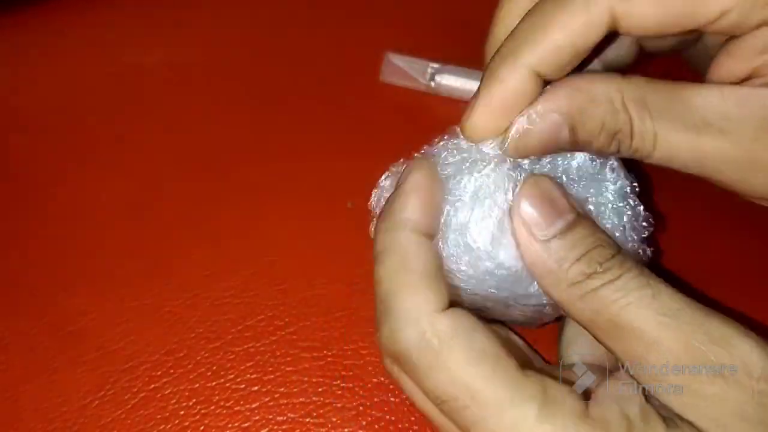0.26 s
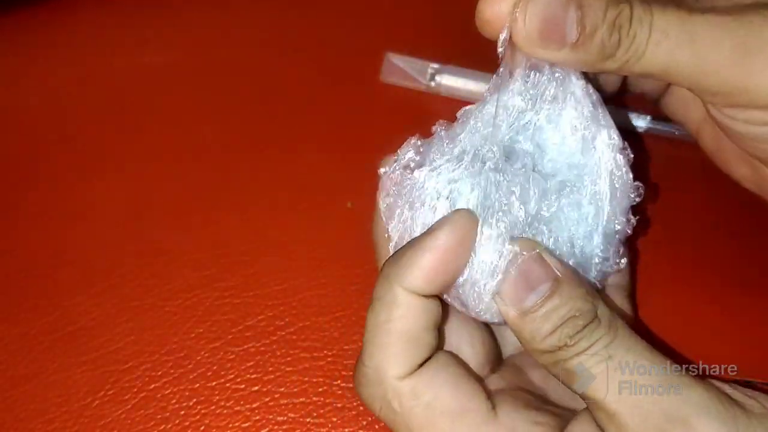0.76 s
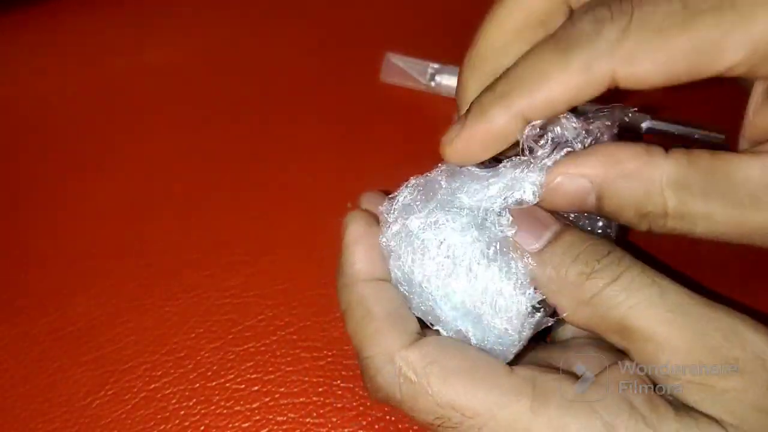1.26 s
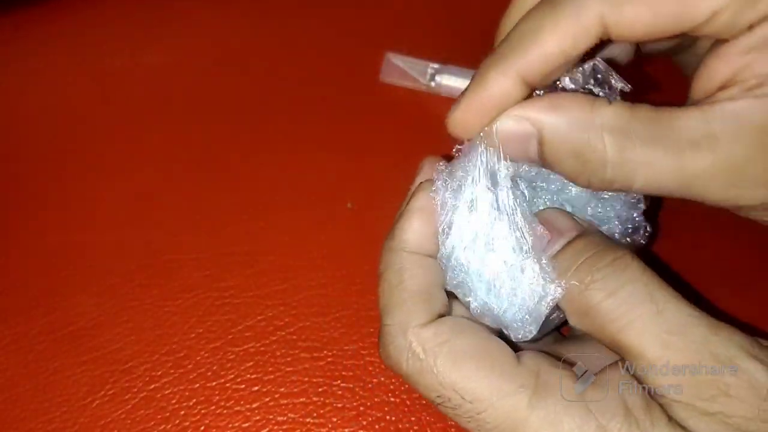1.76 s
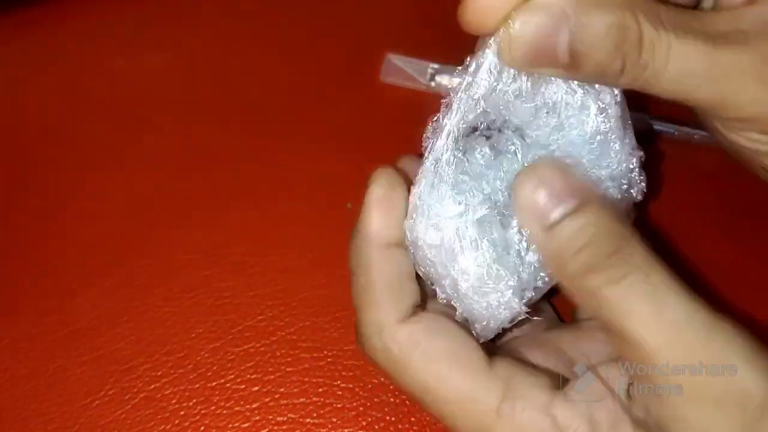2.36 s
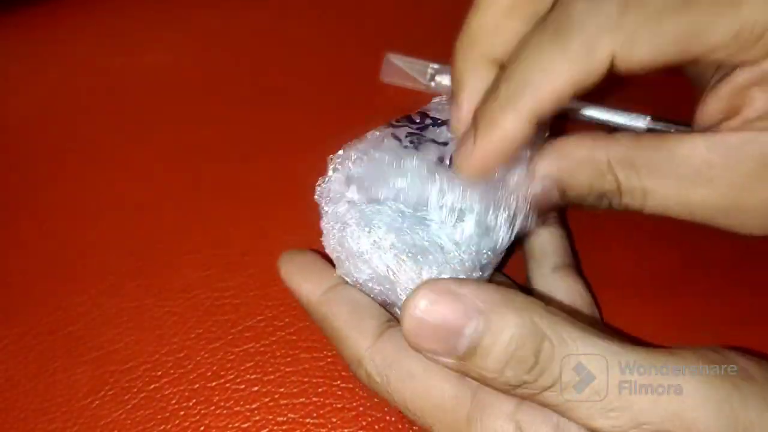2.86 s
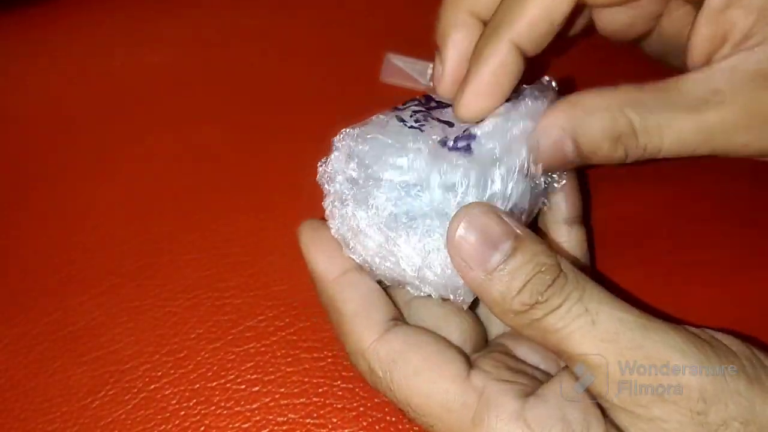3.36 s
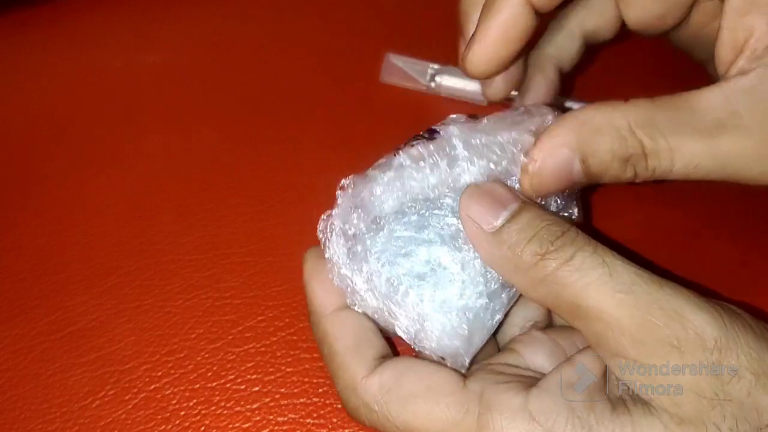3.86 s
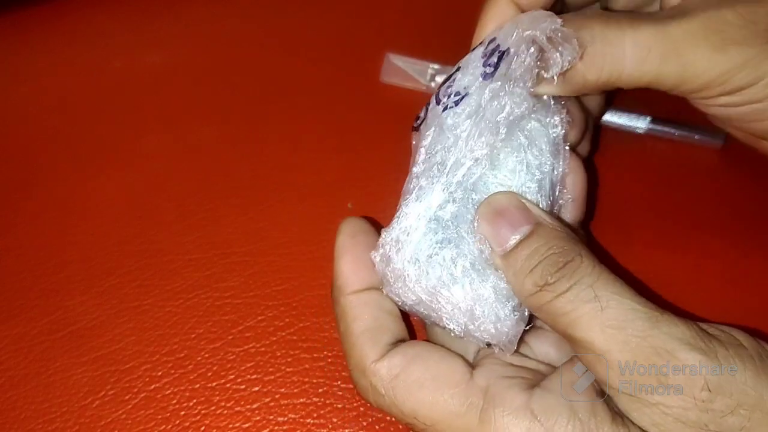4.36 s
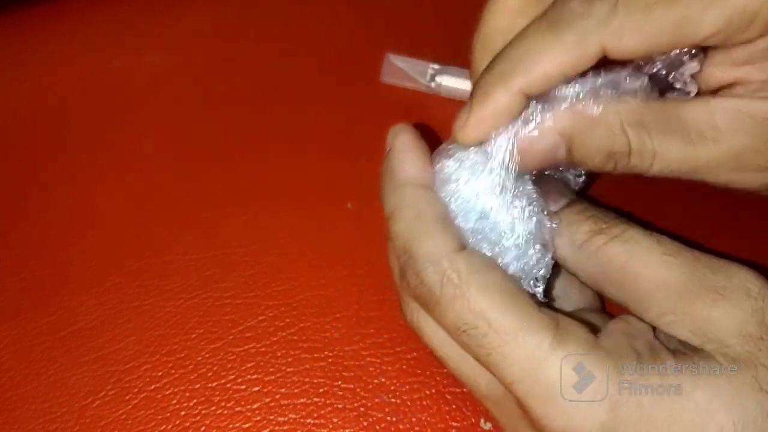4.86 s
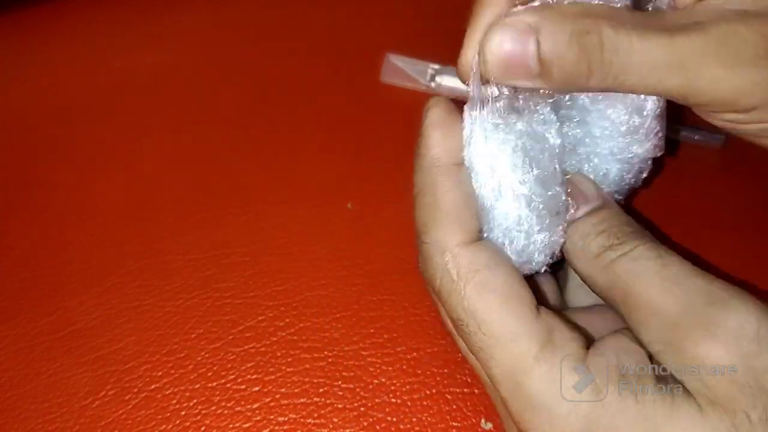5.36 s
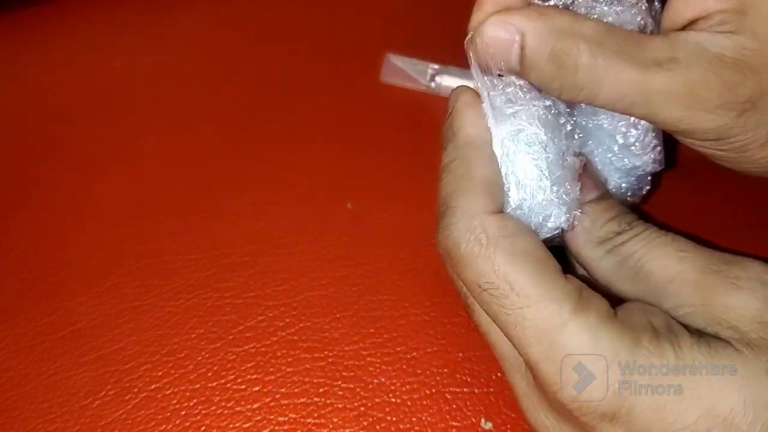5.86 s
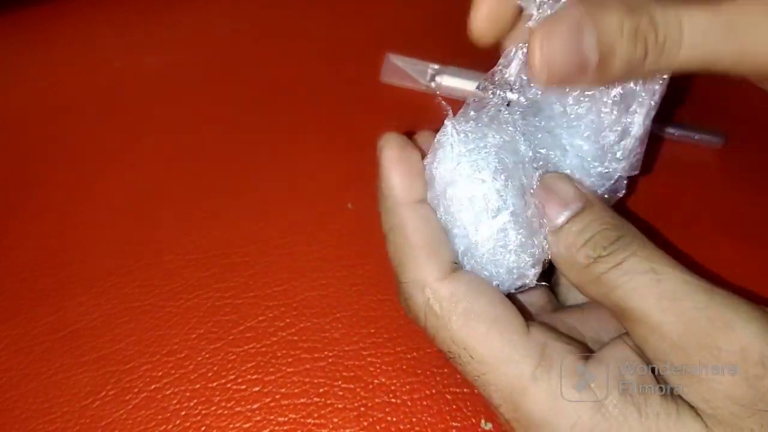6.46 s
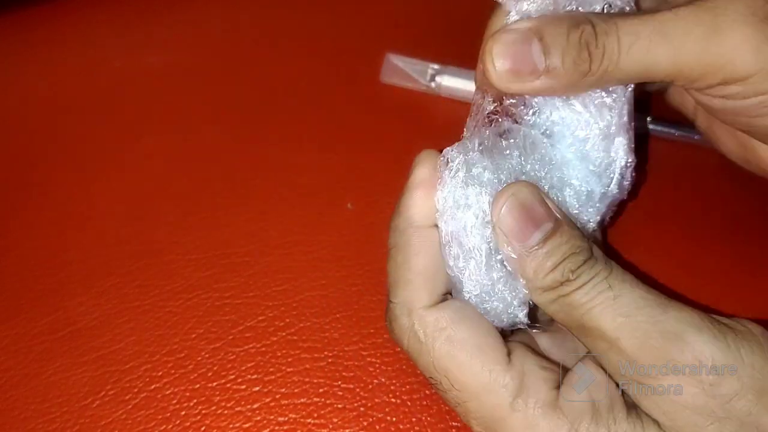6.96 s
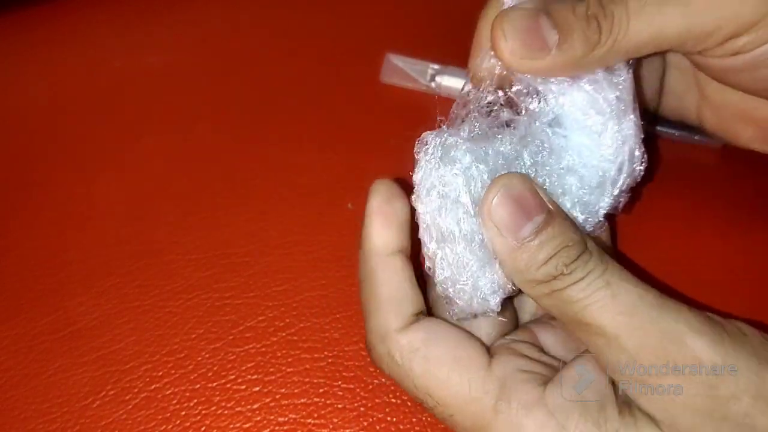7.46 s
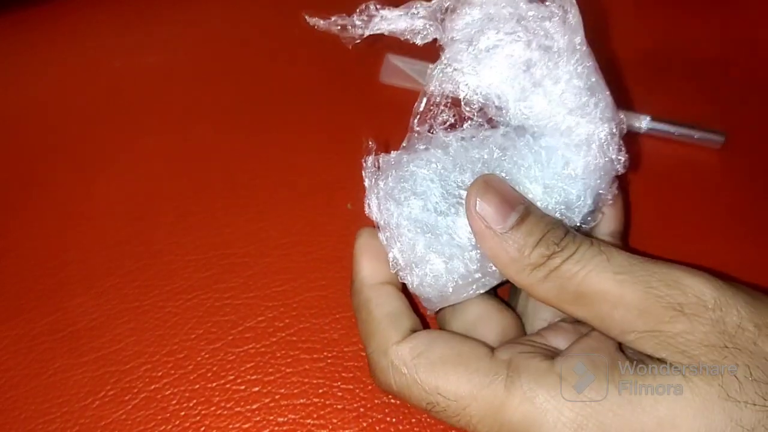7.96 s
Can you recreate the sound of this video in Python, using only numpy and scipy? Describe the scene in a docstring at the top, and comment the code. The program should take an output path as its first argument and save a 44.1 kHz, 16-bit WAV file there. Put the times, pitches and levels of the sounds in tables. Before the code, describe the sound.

Close, dry stereo sound of bubble wrap worked by hands in a quiet room. Crisp crinkling with snaps and low table bumps comes first, then a strong burst of crackle near two seconds. It slackens to light rustling, grows into a dense run of snaps just past four, and peaks with hard snaps near six before thinning out.

```python
"""Hands squeeze a ball of bubble wrap with a few snaps, close to a two-port microphone in a quiet room.
They pull it open in a strong burst near two seconds, slacken, work on past four, and near six come
the hardest snaps, then thinner ones. Random clicks of film in three crease sizes make a dense crackle;
single larger clicks are folds and tape letting go. Bumps and rubs of the hands ring the short, low modes
of the table top; shaped noise is the room tone, and sparse reflections answer the wrap."""
import sys
import numpy as np
from scipy import signal
from scipy.fft import rfft, irfft
from scipy.io import wavfile
from scipy.ndimage import uniform_filter1d

SR = 44100
rng = np.random.default_rng(int(sys.argv[2]) if len(sys.argv) > 2 else 0)


def wav_out(sig):
    """Save sig, one row per channel (or a flat mono array), as 16-bit PCM at SR to the path in sys.argv[1]."""
    wavfile.write(sys.argv[1], SR, np.round(np.clip(np.atleast_2d(sig).T, -1, 1) * 32767).astype(np.int16))


N = 362928  # samples

# Bands in which broad, middle and fine creases sound. Each row: lower edge in Hz, upper edge in Hz.
CREASE_BANDS = [(350, 1570), (1700, 4500), (4500, 15000)]
# Balance of the two microphone ports. Each row: frequency in Hz, left against right in dB.
PORT_BALANCE = [(60, -10.5), (250, 6.5), (500, 4.5), (2000, 0.5), (4400, 4), (7500, 4.5), (9500, -5.5),
                (12000, 13), (15000, -0.5)]


def gain_of(db):
    """Amplitude factor of a level in dB."""
    return 10 ** (np.asarray(db) / 20)


def evened(x):
    """The sound scaled to an rms of one."""
    return x / np.sqrt(np.mean(x ** 2) + 1e-20)


def read(points, hz):
    """Values of a curve between its points, straight over log frequency."""
    f, value = np.transpose(points)
    return np.interp(np.log(hz + 1), np.log(f + 1), value)


def add(mix, s, sound):
    """Lay a sound into the mix at s seconds, cut at the end."""
    part = mix[:, round(s * SR):][:, :sound.shape[1]]
    part += sound[:, :part.shape[1]]


def swells(at, rise, hold, fall, db, steeper=1):
    """Amplitude over time of gestures that each rise, hold and fall; overlapping ones add in power."""
    t = np.arange(0, N / SR + .01, .002)[:, None]
    before = (at - t) / rise
    after = (t - at - hold) / fall
    away = np.maximum(np.maximum(before, after), 0)
    power = (gain_of(db - 10 * steeper * away) ** 2).sum(axis=1)
    return np.interp(np.arange(N) / SR, t[:, 0], np.sqrt(power))


def hush():
    """The low room tone: noise shaped in pitch, patchy in time and pitch, partly alike at the ports."""
    # Room tone with a faint narrow hum. Each row: frequency in Hz, relative level in dB per Hz.
    tone_curve = [(15, -18), (40, -14), (80, 3), (150, 4), (240, -5), (600, -3.5), (730, -7), (780, 4),
                  (840, -16), (1200, -11), (2100, -12), (3200, -21.5), (5500, -79.5)]
    # Likeness of the ports. Each row: frequency in Hz, left-right likeness from 0 to 1.
    likeness = [(60, .75), (200, 0.89), (700, 0.1), (2000, 0.067)]
    level_db, patch_db = -79, 1.83
    frames, hz = N // 256 + 5, np.fft.rfftfreq(1024, 1 / SR)
    a, b, c, d, patches = rng.standard_normal((frames, 513, 5)).T
    patches = uniform_filter1d(patches, 4, 0)
    patches = evened(uniform_filter1d(patches, 12, 1))
    same = read(likeness, hz)[:, None]
    left = a + 1j * b
    right = same * left + np.sqrt(1 - same ** 2) * (c + 1j * d)
    balance_db = np.outer([.5, -.5], read(PORT_BALANCE, hz))[..., None]
    shape_db = read(tone_curve, hz)[:, None] + patch_db * patches + balance_db
    spectra = np.array([left, right]) * gain_of(shape_db)
    tone = signal.istft(spectra, nperseg=1024, noverlap=768)[1][:, :N]
    return gain_of(level_db) * evened(tone)


def table(upper_db):
    """The modes of the table top after a soft blow, each a little different at the two ports."""
    # Each row: frequency in Hz before a random detuning, relative level in dB, time to fall 60 dB in s.
    modes = [(126.7, -1.5, 0.063), (189, -5.5, 0.14), (266.2, 5.5, 0.075), (329, 2.5, 0.096),
             (478, -2.5, 0.057), (610, -7.5, .03)]
    t, out = np.arange(6000) / SR, 0
    for hz, db, t60 in modes:
        phase = 2 * np.pi * hz * rng.normal(1, 0.086) * t + rng.normal(0, 0.45, (2, 1))
        tilt_db = upper_db * np.log2(hz / 270)  # upper_db is per octave
        out = out + gain_of(db + tilt_db - 60 * t / t60) * np.sin(phase)
    return out * (1 - np.exp(-t / 0.006))  # soft onset


def rubs():
    """Skin sticks and slips unevenly over the table top; each slip is a small blow to its modes."""
    # Each row: full strength from in s, rise in s per 10 dB, hold in s, fall in s per 10 dB, level in dB.
    strokes = [(.05, .1, .1, .1, -76), (.34, .11, .2, .1, -65), (.59, .1, .15, .07, -61),
               (1.95, .03, .25, .055, -58), (2.58, .1, .0, .06, -63), (2.78, .06, .0, .05, -62),
               (2.9, .05, .17, .06, -78), (4.34, .08, .0, .05, -63), (6.16, .05, .0, .04, -58.5),
               (7.014, .01, .07, .04, -69), (7.86, .04, .0, .04, -58.5)]
    slips_per_s = 40.  # in each of eight layers
    slips = rng.standard_normal((8, 1, N)) * (rng.random((8, 1, N)) < slips_per_s / SR)
    rumble = sum(signal.oaconvolve(slip, table(-0.5), axes=1)[:, :N] for slip in slips)
    return swells(*np.transpose(strokes)) * evened(rumble)


def knocks():
    """Single bumps of a hand set the modes of the table top ringing."""
    # Each row: start in seconds, peak level in dB, tilt toward the upper modes in dB per octave.
    bumps = [(.152, -57.5, -4), (.277, -52.5, -10), (.337, -45.5, 2), (.428, -45, -3.5), (.478, -49.5, 0),
             (.514, -48.5, 2), (.582, -39.5, 17), (.594, -47, -1), (.646, -43.5, 14), (.729, -46.5, 3),
             (1.031, -63, 2), (1.891, -51, -1), (1.909, -42.5, 21), (1.949, -48, -15), (2.184, -46.5, -8),
             (2.514, -52, 2), (2.553, -50, 0), (2.574, -55, 1), (2.763, -53, 9), (6.096, -47.5, 2),
             (7.072, -53, 21)]
    out = np.zeros((2, N))
    for s, db, upper_db in bumps:
        ring = table(upper_db)
        add(out, s, gain_of(db) * ring / abs(ring).max())
    return out


def room(x, t60):
    """Sparse reflections of random sign fall by 60 dB in t60 seconds, other ones at each port."""
    taps = np.zeros((2, 12000))
    at = np.arange(200, 11980, 20) + rng.integers(0, 20, (2, 589))
    np.put_along_axis(taps, at, rng.choice([-1., 1.], at.shape), 1)
    taps *= gain_of(-60 * np.arange(12000) / SR / t60)
    return signal.fftconvolve(x, taps / np.linalg.norm(taps[0]), axes=1)[:, :N]


def colours():
    """Causal responses of the film, one for each crease size and port: (sizes, ports, taps)."""
    # Film and microphone together. Each row: frequency in Hz, relative level in dB per Hz.
    film_curve = [(180, -48), (300, -25.5), (600, -28.5), (1010, -17.5), (1750, -11), (2000, -3.5),
                  (2550, -2), (4200, 1), (5600, -0.5), (6900, 4.5), (8500, 5), (9800, -1), (12500, -4),
                  (14700, -5), (16000, -22)]
    hz = abs(np.fft.fftfreq(4096, 1 / SR)) + 1
    lo, hi = np.transpose(CREASE_BANDS)[:, :, None, None]
    band = 1 / np.sqrt((1 + (lo / hz) ** 8) * (1 + (hz / hi) ** 8))
    port_db = read(film_curve, hz) + np.outer([.5, -.5], read(PORT_BALANCE, hz))
    log_gain = np.log(band * gain_of(port_db) + 1e-7)
    minimum_phase = np.exp(np.conj(signal.hilbert(log_gain)))
    taps = np.fft.ifft(minimum_phase).real[..., :1024]
    return taps / np.linalg.norm(taps, axis=(1, 2), keepdims=True)


def buckle(rattle_db, t60, lag, ring_db):
    """The film creeps, ticks, then rattles; left lags by lag samples: (sizes, ports, taps)."""
    # Left-right likeness of the rattle, from 0 to 1, for broad, middle and fine creases.
    rattle_likeness = [0.54, 0.39, 0.26]
    t = (np.arange(1200) - 100) / SR
    a, b = rng.standard_normal((2, 1200))
    same = np.array(rattle_likeness)[:, None]
    right = same * a + np.sqrt(1 - same ** 2) * b
    out = np.stack([a + 0 * same, right], axis=1)
    fade = np.where(t > 0, t / t60, -t / .005)  # the creep swells by 60 dB in 5 ms
    out = out * gain_of(rattle_db - 60 * fade)
    out[..., 100] = rng.choice([-1., 1.])  # the tick
    cycles = np.fft.rfftfreq(2048)
    late = np.exp(-2j * np.pi * np.outer([lag, 0], cycles))
    # the patch of film that buckles favours a pitch of its own within each size
    lo, hi = np.log(CREASE_BANDS).T
    own_hz = np.exp(lo + (hi - lo) * rng.uniform(.2, .8, 3))[:, None, None]
    resonance = 1 / (1 + 1j * (cycles * SR - own_hz) / (.05 * own_hz))
    ring = 1 + gain_of(ring_db).reshape(-1, 1, 1) * resonance
    return irfft(rfft(out, 2048) * late * ring)


def working(size):
    """How loudly creases of one size sound: squeezes and pulls of the fingers over the held ball."""
    # Each row: full strength from in s, rise in s per 10 dB, hold in s, fall in s per 10 dB,
    # fine creases in dB, middle against fine in dB, broad against fine in dB; slopes hold for fine creases.
    pulls = [(.0, .05, .07, .06, -50, -11, -20), (.26, .13, .0, .1, -46.5, -11, -27),
             (.43, .14, .07, .1, -42.5, -9, -19), (.6, .12, .09, .06, -39, -7, -21),
             (.87, .14, .0, .07, -46.5, -9, -38), (1.08, .08, .0, .06, -49, -11, -31),
             (1.2, .06, .0, .09, -46.5, -14, -36), (1.47, .26, .0, .05, -46, -12, -37),
             (1.51, .02, .1, .16, -36.5, -10, -23), (1.82, .07, .0, .09, -38, -9, -23),
             (1.94, .035, .0, .08, -31, -11, -16), (2.03, .1, .07, .11, -41, -9, -13),
             (2.33, .08, .02, .085, -42.5, -8, -36), (2.52, .055, .0, .12, -45.5, -12, -35),
             (2.74, .15, .0, .07, -55, -8, -33), (2.85, .06, .05, .1, -50.5, -14, -26),
             (2.96, .1, .02, .11, -50.5, -8, -24), (3.24, .08, .0, .1, -52, -16, -33),
             (3.415, .03, .14, .14, -46.5, -10, -24), (3.8, .12, .0, .13, -52, -16, -34),
             (4.04, .07, .06, .2, -42.5, -9, -17), (4.18, .1, .03, .14, -39, -8, -15),
             (4.3, .1, .12, .04, -44.5, -8, -10), (4.46, .03, .0, .055, -40, -5, -11),
             (4.58, .2, .0, .1, -50, -9, -28), (4.66, .1, .0, .12, -44.5, -6, -19),
             (4.92, .065, .0, .05, -38.5, -9, -23), (5.02, .07, .0, .24, -39, -8, -18),
             (5.4, .05, .1, .1, -44.5, -10, -24), (5.66, .08, .0, .2, -46.5, -10, -32),
             (5.82, .1, .04, .045, -40, -9, -21), (5.96, .04, .0, .08, -40, -8, -38),
             (6.081, .04, .04, .07, -34, -8, -16), (6.3, .2, .0, .5, -48.5, -11, -36),
             (6.52, .03, .0, .06, -46, -11, -36), (6.62, .1, .12, .1, -46.5, -11, -29),
             (6.82, .1, .0, .25, -42, -10, -33), (7.0, .1, .0, .05, -49, -7, -30),
             (7.035, .01, .0, .12, -41, -5, -10), (7.3, .1, .0, .2, -48, -13, -37),
             (7.54, .1, .0, .1, -49, -7, -29), (7.63, .1, .01, .1, -52, -7, -28),
             (7.88, .17, .02, .09, -54.5, -11, -33), (8.04, .1, .0, .14, -61.5, -22, -28)]
    # Level in dB of broad, middle and fine creases of the ball merely held.
    resting_db = [-85, -88, -74]
    # Slope factor for broad, middle and fine: larger creases start later and stop sooner in a pull.
    slope_factor = [1.6, 1.15, 1]
    *shape, fine_db, middle_db, broad_db = np.transpose(pulls)
    level_db = fine_db + [broad_db, middle_db, 0][size]
    pulled = swells(*shape, level_db, slope_factor[size])
    return np.hypot(pulled, gain_of(resting_db[size]))


def crackle(film):
    """Buckles come in clumps; the fingers work one patch of the ball for a moment, then another."""
    # Strength in dB with which a patch favours its own pitch, for broad, middle and fine creases.
    patch_ring_db = [16., 7., 1.]
    # Share of the buckles that come from the patch under the fingers, for broad, middle and fine.
    worked_share = [.7, .4, .15]
    per_s, spread_db = 3500., 3.8  # buckles a second in each size; exponential spread of their strengths
    patches, moves_per_s = 24, 18
    clumps = gain_of(evened(uniform_filter1d(rng.standard_normal(N), 300)))
    grains = np.array([buckle(-14, .009, rng.normal(2.2, 1.5), patch_ring_db) for _ in range(patches)])
    # half of the buckles in a size move creases of every size at once, the others that size alone
    strengths = gain_of(spread_db * np.minimum(rng.exponential(1, (4, N)), 5))
    trains = strengths * (rng.random((4, N)) < .5 * per_s / SR)
    out = np.zeros((2, N))
    for size in range(3):
        clicks = (trains[size] + trains[3]) * clumps
        worked = rng.integers(0, patches, N)[np.cumsum(rng.random(N) < moves_per_s / SR)]
        stays = rng.random(N) < worked_share[size]
        place = np.where(stays, worked, rng.integers(0, patches, N))
        train = 0
        for k, grain in enumerate(grains):
            sound = grain[size, :, :1000] / np.linalg.norm(grain[size])
            train = train + signal.oaconvolve((clicks * (place == k))[None], sound, axes=1)
        heard = evened(signal.oaconvolve(train, film[size], axes=1)[:, :N])
        out += working(size) * heard
    return out


def small_snaps():
    """Lesser snaps at random moments, as strong as the film is worked; columns as in snaps()."""
    per_s, above_db = 8., 24  # rate; fine part against the crackle
    middle_offset_db, broad_offset_db = -2, -2  # added to the balance of the crackle
    at = np.flatnonzero(rng.random(N - 2000)[200:] < per_s / SR) + 200
    broad_db, middle_db, fine_db = (20 * np.log10(working(size)[at]) for size in range(3))
    vary = rng.standard_normal((len(at), 4)).T
    strength_db = fine_db + above_db + 3 * vary[0]
    middle_part_db = middle_db - fine_db + middle_offset_db + 4 * vary[1]
    broad_part_db = broad_db - fine_db + broad_offset_db + 4 * vary[2]
    return np.transpose([at / SR, strength_db, middle_part_db, broad_part_db, 4 * vary[3]]).tolist()


def snaps(film):
    """A larger fold or tape lets go at once, its tick 100 samples into the sound."""
    # Each row: tick in seconds, energy of the fine part in dB, middle against fine in dB,
    # broad against fine in dB, left against right in dB.
    single_snaps = [(.2943, -22.5, -10, -36, 12), (.3187, -18, -18, -42, 4), (.4322, -14, -8, -32, -5),
                    (.4441, -10.5, -6.5, -19, -1), (.4797, -4, -10, -21.5, 2), (.5798, -12, -10, -18, 2),
                    (.592, -13.5, -16, -22, 2), (.601, -8, -18, -25, -5), (.6188, -6.5, -8, -17, -2),
                    (.6274, -10.5, -14, -22, 0), (.6506, -10, -8, -26, -2), (.6924, -9.5, -8, -33, 4),
                    (.7046, -9, -11.5, -23, 2), (.8087, -15.5, -17, -40, 2), (1.271, -11.5, -17.5, -40, 0),
                    (1.3446, -18, -8.5, -43, -1), (1.3787, -13, -12, -39, 0), (1.5079, -2.5, -17, -41, -3),
                    (1.5839, -2, -23, -38, 0), (1.606, -6, -20, -23, 4), (1.655, -9.5, -18, -22, 3),
                    (1.6743, -13, -9.5, -31, 0), (1.699, -12.5, -9, -30, 0), (1.7283, -13, -5.5, -33, -1),
                    (1.7699, -8, -12, -40, -3), (1.8257, -1, -13.5, -20.5, -3), (1.8385, -3, -16, -15, -8),
                    (1.9101, -9, -21, -23, -1), (1.9312, -3.3, -9, -16, -3), (1.9362, -2.5, -10, -25, 10),
                    (1.947, -3, -9, -9.5, -5), (1.9755, -13, -16, -7, 1), (2.09, 1.2, -8.5, -6.5, 1),
                    (2.1636, -10, -12, -25, 2), (2.3032, -16.5, -12, -37, -5), (2.5366, -19.5, -17, -35, 5),
                    (2.8218, -20.5, -26, -40, 2), (2.942, -20, -9, -30, 2), (3.179, -25, -26, -38, 4),
                    (3.2507, -17.5, -23, -44, 2), (3.414, -18.5, -7, -26, 0), (4.1364, -11.5, -8, -20, 0),
                    (4.1601, -9, -6.5, -10, 1), (4.1716, -6.5, -3, -7.5, -1), (4.1807, -7, -8, -13, 5),
                    (4.1899, -8, -12, -8, 1), (4.196, -12, -14, -15, 5), (4.2033, -14, -12, -15, 0),
                    (4.2157, -7.5, -6, -5.5, 2), (4.2186, -11, -2, -9, 1), (4.2311, -6, -7, -11, -2),
                    (4.273, -10, -.6, -2.5, 2), (4.294, -2.9, -2.5, -9, 3), (4.3293, -5.5, -5.5, -4, 3),
                    (4.3477, -6.7, -8, -7.5, -1), (4.3755, -3.8, -7, -6.5, 1), (4.3906, -8, -19, -15, 3),
                    (4.4154, -11, -4, -10, 2), (4.4338, -10.5, -4, -9, 3), (4.4388, -12, -7, -12, 2),
                    (4.4485, -8.5, -7, -19, 5), (4.4564, -12.5, -15, -15, -2), (4.459, -15, -4, -18, 1),
                    (4.4723, -10.5, -4, -13, 3), (4.5914, -20, -12, -37, 2), (5.0161, -9.5, -3, -13.5, -2),
                    (5.1086, -14, -7.5, -21, 1), (5.1645, -12.5, -15, -23, -1), (5.214, -10, -20, -42, -1),
                    (5.2562, -10.5, -11.5, -44, 1), (5.351, -25.5, -12, -35, 5),
                    (5.5765, -14.5, -14, -42, 0), (5.798, -11, -11, -28, 3), (5.815, -4.5, -15, -35, 1),
                    (5.8246, -13, -13, -28, -4), (5.832, 5.5, -15, -27, -2), (5.8556, -4, -11, -26, -1),
                    (5.942, .7, -14.5, -51, -1), (6.054, -9, -16, -37, 2), (6.0836, -4, -2, -14, 1),
                    (6.0979, -.6, 2.1, -1.5, -5), (6.1647, -17, -8, -15, 7), (6.6744, -19, -4, -33, 3),
                    (6.8148, -17, -3, -37, 0), (6.9356, -15.5, -5.5, -29, 1), (7.0282, 2.8, -12.5, -18, -3),
                    (7.1913, -14.5, -22, -41, 1), (7.2122, -23.5, -.6, -32, 4),
                    (7.3167, -15.5, -15, -39, -1), (7.5258, -18, -5.5, -25, -1),
                    (7.5396, -21.5, 3, -28, -1), (7.6171, -18, -10, -35, -6), (7.9397, -24.5, -5, -27, 0)]
    rattle_db, rattle_t60 = -16, .014  # rattle against its tick; seconds to fall 60 dB
    lag, lag_spread = 2.9, 1.1  # samples by which left lags
    out = np.zeros((2, N))
    for s, db, middle_db, broad_db, pan_db in [*single_snaps, *small_snaps()]:
        fold = buckle(rattle_db, rattle_t60, rng.normal(lag, lag_spread), 0.)
        parts = signal.fftconvolve(fold, film, axes=2)
        parts = np.sqrt(2) * parts / np.linalg.norm(parts, axis=(1, 2), keepdims=True)
        snap = gain_of(broad_db) * parts[0] + gain_of(middle_db) * parts[1] + parts[2]
        add(out, s - 100 / SR, gain_of(db + np.array([[.5], [-.5]]) * pan_db) * snap)
    return out


def scene():
    """The wrap and its reflections, the hands on the table, and the room tone."""
    film = colours()
    wrap = crackle(film) + snaps(film)
    echoes = gain_of(-14) * room(wrap, .12)
    return wrap + echoes + knocks() + rubs() + hush()


def record(dry):
    """The band limit: a steep low-pass."""
    edge_hz = 16300
    low_pass = signal.firwin(511, edge_hz, window=("kaiser", 9), fs=SR)
    return signal.oaconvolve(dry, low_pass[None], "same")


dry = scene()
out = record(dry)
wav_out(out)
```